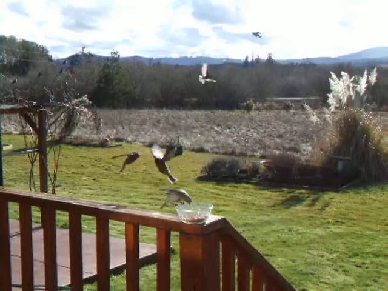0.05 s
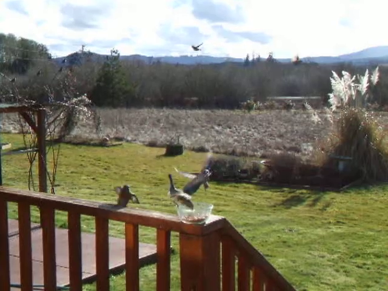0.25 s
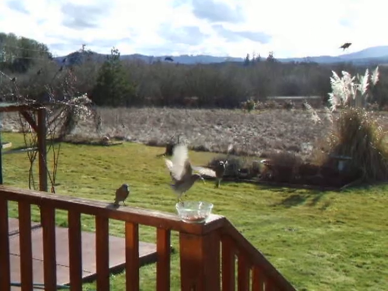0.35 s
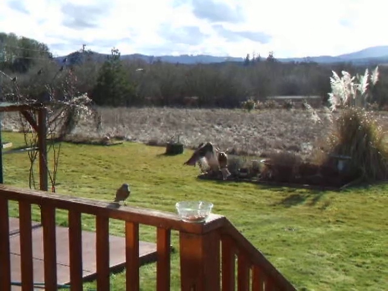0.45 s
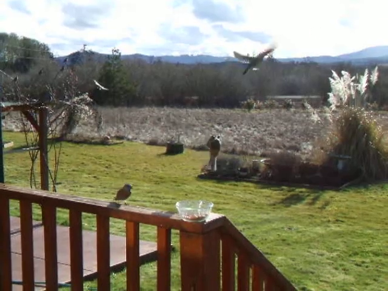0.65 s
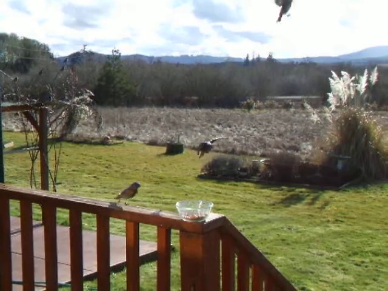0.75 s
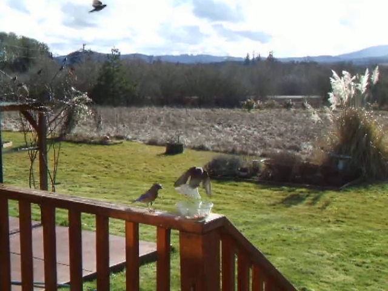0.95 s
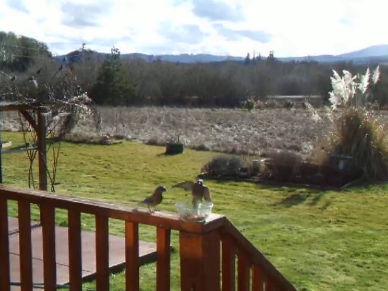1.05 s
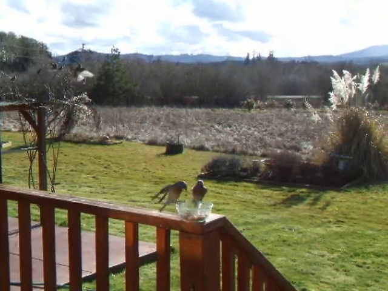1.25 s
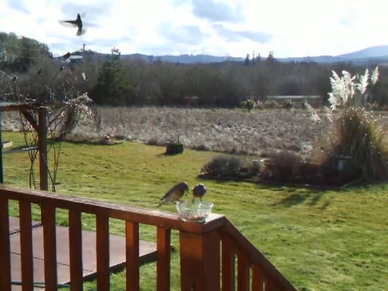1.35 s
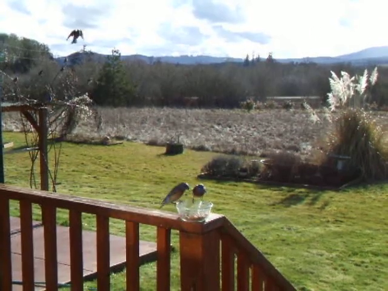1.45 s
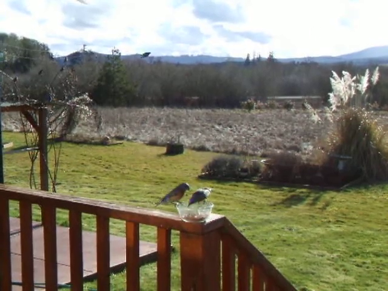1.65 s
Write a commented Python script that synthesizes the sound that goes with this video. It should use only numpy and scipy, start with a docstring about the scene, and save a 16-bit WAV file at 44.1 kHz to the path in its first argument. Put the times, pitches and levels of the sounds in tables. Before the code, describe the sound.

Small birds tap and click on a wooden railing and dish, over outdoor hiss.

```python
"""Small birds at a seed dish

Small birds land on a wooden deck railing and tap at a seed dish: each contact is a ringing knock,
a hard click and a scratch. Their wings brush past in grainy swells of noise. Others whistle short
chirps across the garden, and something honks faintly far away. Under it all lies outdoor air,
and a mono camera adds its own hiss and the tiny humming steps of its lens motor."""
import sys
import numpy as np
from scipy import signal
from scipy.fft import rfft, irfft, next_fast_len
from scipy.io import wavfile
from scipy.ndimage import map_coordinates

SR = 44100
rng = np.random.default_rng(int(sys.argv[2]) if len(sys.argv) > 2 else 0)


def generate_wav(sig):
    """Save sig (samples, or channels by samples) to the path in sys.argv[1] as 16-bit PCM at SR."""
    pcm = np.round(np.clip(np.atleast_2d(sig).T, -1, 1) * 32767).astype(np.int16)
    wavfile.write(sys.argv[1], SR, pcm)


N = 74970

# bed of outdoor air and microphone noise: (frequency [Hz], level [dB])
AIR_SPECTRUM = [(25, -6), (70, -5), (140, -14), (260, -10.5), (420, -9.5), (600, -5.5), (1100, -9.5),
                (2750, -9.5), (4000, -7.5), (6040, -7), (7900, -13), (9000, -34)]
# the camera's treble hiss: (frequency [Hz], level [dB])
HISS_SPECTRUM = [(3000, -18), (4500, -15.5), (5800, -8), (7300, -3.5), (9000, -33.5)]
# fader ride on that hiss: (time [s], level [dB])
HISS_RIDE = [(0, -62), (.25, -55.5), (.43, -68), (.72, -70.5), (.86, -67), (.92, -54), (1.05, -50.5),
             (1.27, -54), (1.48, -55), (1.55, -48), (1.7, -52)]
# lens motor steps: (middle time [s], hum level [dB], whine level [dB])
MOTOR_STEPS = [(.098, -48.5, -60), (.135, -49.5, -45), (.171, -51.5, -45.5), (.205, -64, -44),
               (.242, -46, -47), (.27, -56, -45), (.567, -49, -62), (.666, -50, -71), (.899, -52.5, -55),
               (.932, -51, -66), (1.134, -53.5, -51), (1.233, -48, -48), (1.335, -53, -47),
               (1.432, -50, -48.5), (1.537, -52, -43), (1.667, -51, -64)]
# far honks: (time [s], length [s], pitch [Hz], level [dB])
HONK_CUES = [(1.005, 0.014, 864, -56), (1.03, 0.038, 886, -48), (1.193, 0.044, 894, -49)]
# garden chirps: (time [s], length [s], first pitch [Hz], middle pitch [Hz], last pitch [Hz],
# level [dB], roughness [0-1])
CHIRP_CUES = [(.043, 0.028, 3190, 3250, 3230, -49, 0.36), (0.159, 0.036, 3210, 3800, 4520, -49.5, 0),
              (.179, .034, 4490, 3750, 3200, -46.5, 0.2), (0.321, .022, 2420, 2216, 2050, -47, 0.2),
              (0.474, 0.045, 5600, 4150, 3500, -50, 0.9), (.522, 0.048, 3260, 2780, 2840, -46, 0.6),
              (.579, 0.029, 3150, 2150, 2970, -44.5, 0.4), (.882, 0.032, 4710, 4550, 4470, -47, 1),
              (.884, 0.055, 2695, 2694, 2820, -47, 0.82), (0.92, 0.055, 2803, 3083, 2910, -46.5, 0.78),
              (1.294, 0.049, 3593, 2883, 2890, -42.5, 0.72), (1.34, .045, 2796, 2828, 2950, -51, 0.74),
              (1.522, 0.036, 3154, 2780, 3230, -51.5, 0.07), (1.569, 0.046, 3400, 3336, 2600, -46, 0.24),
              (1.61, 0.045, 3538, 3520, 3370, -46, 0.47)]
# tone colour of brushing feathers: (frequency [Hz], level [dB])
FEATHER_SPECTRUM = [(200, -19), (800, -2.5), (1800, -1.5), (4300, -0.5), (5800, 4), (6400, 2), (7200, 10.5),
                    (8000, -6), (8600, -11)]
# wing brushes: (peak time [s], level [dB], rise constant [s], fall constant [s])
WING_CUES = [(0.307, -39, 0.012, 0.0044), (0.612, -33, 0.0052, 0.003), (0.6195, -26, 0.0023, 0.0047),
             (0.627, -30.5, 0.0024, 0.0081)]
# resonances of the wooden rail: (frequency [Hz], level [dB])
RAIL_MODES = [(310, -5.5), (500, -7), (765, 0.5), (1080, -5.5), (1480, -6.5), (1660, -2), (2080, -3.5),
              (2450, 0), (2780, 0), (3600, 0)]
# hard click of claw or beak: (frequency [Hz], level [dB], T60 [s], rise [s])
CLICK_MODES = [(5730, 2, .0066, .0018), (7350, 10, .0033, .0009)]
# tone colour of the scratch in a tap: (frequency [Hz], level [dB])
SCRATCH_SPECTRUM = [(200, -12.5), (600, -4), (1300, -2), (2300, -0.5), (4200, -6), (6000, -5.5),
                    (8500, -18.5)]
# taps of feet and beaks: (time [s], wood level [dB], wood centre [Hz], click level [dB],
# click pitch [ratio], scratch level [dB], contact rise [s])
TAP_CUES = [(0.1912, -21.5, 1350, -60, 0.95, -35, 0.00098), (.2285, -20, 760, -12.5, 1, -17.5, 0.00044),
            (.2725, -41, 2600, -42, 1, -43.5, 0.00057), (0.3115, -25, 1200, 0.5, 0.99, -18, 0.00046),
            (.3540, -15.5, 1750, -9.5, 0.96, -20, .0003), (0.3553, -22, 2500, -4, 0.905, -26, 0.00033),
            (0.369, -50, 1200, -27, 0.92, -32, .0015), (.4540, -32, 470, -40, 0.85, -25, 0.0012),
            (0.482, -60, 2500, -26, 0.87, -42, 0.00077), (0.509, -32.5, 290, -62, 1, -60, 0.0018),
            (1.233, -34, 290, -53, 1, -50, .002)]

AIR_DB = -46.5
STEP_S, HUM_HZ, WHINE_HZ = .024, 636.4, 4780
HONK_WAVER_HZ = 75
RASP_SWING_HZ, RASP_RATE_HZ, FLICKER_DB = 490, 300, 2.5
RAIL_T60_S, RAIL_DAMPING = .021, .35  # ring of the second mode; exponent that shortens higher ones
FOCUS_DB = 12  # loss one octave from a tap's wood centre
LOW_CUT_RATIO, SCRATCH_T60_S = 0.42, 0.02
DECK_DECAY_S, DECK_WET_DB = .03, -23
GARDEN_DECAY_S, GARDEN_WET_DB = .2, -5
CEILING, ROLL_OFF_HZ, TOP_HZ = .62, 8290, 9300


def amp(db):
    """Decibels to gain."""
    return 10 ** (np.asarray(db) / 20)


def unit(x):
    """Scale to rms 1."""
    return x / np.sqrt(np.mean(x ** 2) + 1e-20)


def filtered(x, response):
    """Filter x with a gain given as a function of frequency."""
    size = next_fast_len(len(x) + 8192)
    return irfft(rfft(x, size) * response(np.fft.rfftfreq(size, 1 / SR)), size)[:len(x)]


def colour(x, points):
    """EQ x along a curve of (frequency [Hz], level [dB]) points."""
    point_hz, db = np.transpose(points)
    return filtered(x, lambda hz: amp(np.interp(np.log(hz + 1), np.log(point_hz + 1), db)))


def noise(points):
    """A scene's length of coloured noise at rms 1."""
    return unit(colour(rng.standard_normal(N), points))


def burst(points, envelope):
    """A short coloured noise under an envelope, its spectrum evened out so that no pitch sticks out."""
    x = envelope * rng.standard_normal(len(envelope))
    for _ in range(4):
        flat = irfft(np.exp(1j * np.angle(rfft(x))), len(x))
        x = flat * (envelope / envelope.max()) ** (1 / 4)
    return unit(colour(x, points)) * np.sqrt(np.mean(envelope ** 2))


def wobble(rate, t):
    """A smooth random modulator, rate knots a second."""
    return map_coordinates(rng.standard_normal(2048), [t * rate], mode="wrap")


def tone(hz):
    """A sine of rms 1 that follows a pitch curve."""
    return np.sqrt(2) * np.sin(2 * np.pi * np.cumsum(hz) / SR)


def swell(length):
    """Time axis and rounded envelope of a short note."""
    t = np.arange(int(length * SR)) / SR
    return t, np.sqrt(np.abs(np.sin(np.pi * t / length)))


def strike(t, t60, rise):
    """Percussive envelope: a quick attack and an exponential decay."""
    return np.exp(-np.log(1000) * t / t60) * (1 - np.exp(-t / rise))


def add(track, start, sound):
    """Mix a sound in at start seconds."""
    i = max(0, round(start * SR))
    track[i:i + len(sound)] += sound[:max(0, len(track) - i)]


def reverb(x, decay_s, wet_db):
    """x plus a diffuse tail that dies away by about 53 dB every decay_s."""
    t = np.arange(SR // 2) / SR
    tail = rng.standard_normal(len(t)) * 0.0023 ** (t / decay_s) * (1 - np.exp(-t / 0.011))
    return x + amp(wet_db) * signal.fftconvolve(x, tail / np.linalg.norm(tail))[:N]


def air_and_hiss():
    """The bed: steady outdoor air and microphone noise, with a treble hiss that drifts in level."""
    hiss_db = np.interp(np.arange(N) / SR, *np.transpose(HISS_RIDE))
    return amp(AIR_DB) * noise(AIR_SPECTRUM) + amp(hiss_db) * noise(HISS_SPECTRUM)


def lens_motor():
    """Every step of the motor is a short low hum with a thin whine on top."""
    out = np.zeros(N)
    t, shape = swell(STEP_S)
    for middle, hum_db, whine_db in MOTOR_STEPS:
        hum = amp(hum_db) * shape ** 4 * tone(HUM_HZ + 30 * wobble(180, t))
        whine = amp(whine_db) * shape ** 2 * tone(WHINE_HZ + 30 * wobble(180, t))
        add(out, middle - STEP_S / 2, hum + whine)
    return out


def honks():
    """Distance leaves only one wavering partial of each honk."""
    out = np.zeros(N)
    for start, length, hz, db in HONK_CUES:
        t, shape = swell(length)
        add(out, start, amp(db) * shape * tone(hz + HONK_WAVER_HZ * wobble(294, t)))
    return out


def chirps():
    """Each chirp is one whistle bent through three pitches; a fast, uneven vibrato makes it rasp."""
    out = np.zeros(N)
    for start, length, first_hz, middle_hz, last_hz, db, roughness in CHIRP_CUES:
        t, shape = swell(length)
        bend_hz = np.polyval(np.polyfit([0, .5, 1], [first_hz, middle_hz, last_hz], 2), t / length)
        vibrato_rate = RASP_RATE_HZ * (1 + 0.401 * wobble(RASP_RATE_HZ, t))
        vibrato = np.sin(2 * np.pi * np.cumsum(vibrato_rate) / SR)
        envelope = amp(db + FLICKER_DB * wobble(152, t)) * shape
        add(out, start, envelope * tone(bend_hz + roughness * RASP_SWING_HZ * vibrato))
    return out


def wings():
    """Feathers brush past in a few quick, grainy swells."""
    out, t = np.zeros(N), np.arange(SR // 10) / SR
    middle = t.mean()
    for peak, db, rise, fall in WING_CUES:
        shape = np.exp(np.minimum((t - middle) / rise, (middle - t) / fall))
        grainy_gain = amp(db + 1.1 * wobble(900, t))
        add(out, peak - middle, burst(FEATHER_SPECTRUM, grainy_gain * shape))
    return out


def rail_knock(t, centre_hz, contact_s):
    """The wood rings; where and how hard a tap lands picks the modes that speak, around centre_hz."""
    wood = np.zeros(len(t))
    for hz, db in RAIL_MODES:
        gain = amp(db - FOCUS_DB * np.log2(hz / centre_hz) ** 2 + rng.normal(0, 1))
        t60 = RAIL_T60_S * (RAIL_MODES[1][0] / hz) ** RAIL_DAMPING
        wood += gain * strike(t, t60, contact_s) * np.sin(2 * np.pi * hz * t)
    return wood


def hard_click(t, pitch_ratio, contact_s):
    """Claw or beak snaps in two bright partials, delayed until the contact is firm."""
    click = sum(amp(db) * strike(t, t60, rise) * np.sin(2 * np.pi * hz * pitch_ratio * t)
                for hz, db, t60, rise in CLICK_MODES)
    return np.pad(click, (round(contact_s * SR), 0))[:len(t)]


def taps():
    """Each contact of foot or beak layers a knock, a click and a scratch, with the low end trimmed."""
    out, t = np.zeros(N), np.arange(SR // 10) / SR
    for start, wood_db, centre_hz, click_db, pitch_ratio, scratch_db, contact_s in TAP_CUES:
        wood = amp(wood_db) * rail_knock(t, centre_hz, contact_s)
        click = amp(click_db) * hard_click(t, pitch_ratio, contact_s)
        scratch = amp(scratch_db) * burst(SCRATCH_SPECTRUM, strike(t, SCRATCH_T60_S, contact_s))
        low_cut = signal.butter(2, LOW_CUT_RATIO * centre_hz, "high", fs=SR, output="sos")
        add(out, start, signal.sosfilt(low_cut, wood + click + scratch))
    return out


def scene():
    """The deck up close and nearly dry, the garden set back in reverb, all on one microphone."""
    deck = reverb(taps() + wings(), DECK_DECAY_S, DECK_WET_DB)
    garden = reverb(chirps() + honks(), GARDEN_DECAY_S, GARDEN_WET_DB)
    mono = deck + garden + lens_motor() + air_and_hiss()
    return np.array([mono, mono])


def record(dry):
    """The camera soft-clips the highest peaks and rolls off steeply at its band limit."""
    rounded = dry / (1 + np.abs(dry / CEILING) ** 4) ** (1 / 4)
    high_cut = lambda hz: np.sin(np.pi / 2 * np.clip((TOP_HZ - hz) / (TOP_HZ - ROLL_OFF_HZ), 0, 1)) ** 2
    return np.array([filtered(channel, high_cut) for channel in rounded])


dry = scene()
out = record(dry)
generate_wav(out)
```